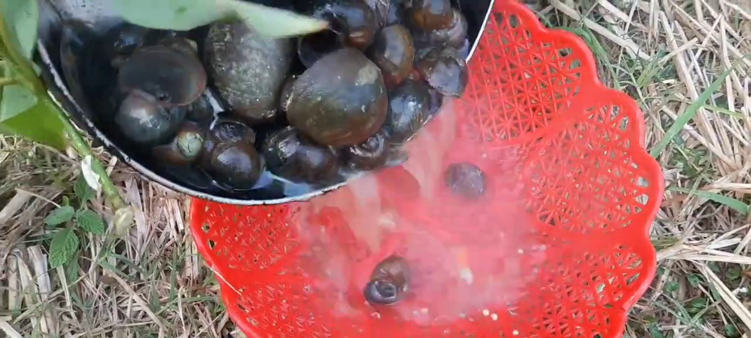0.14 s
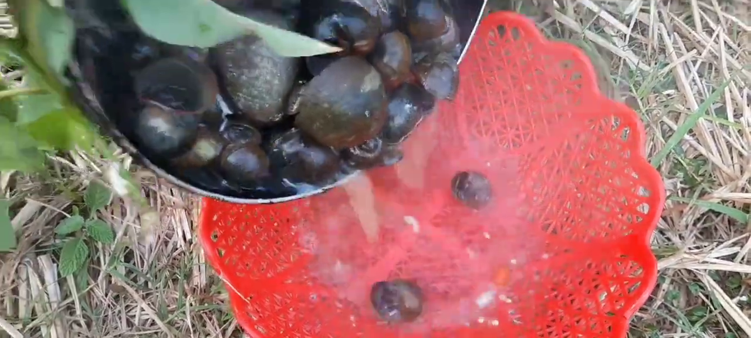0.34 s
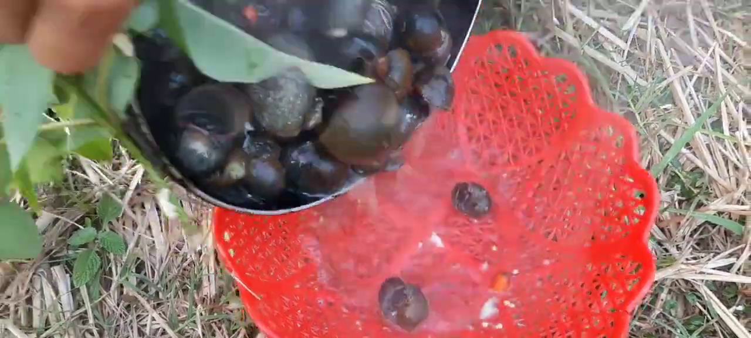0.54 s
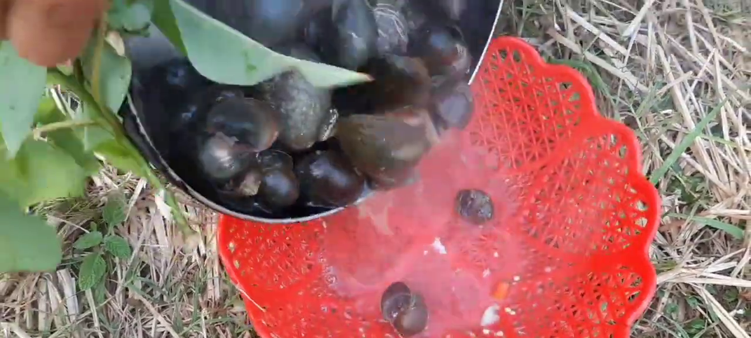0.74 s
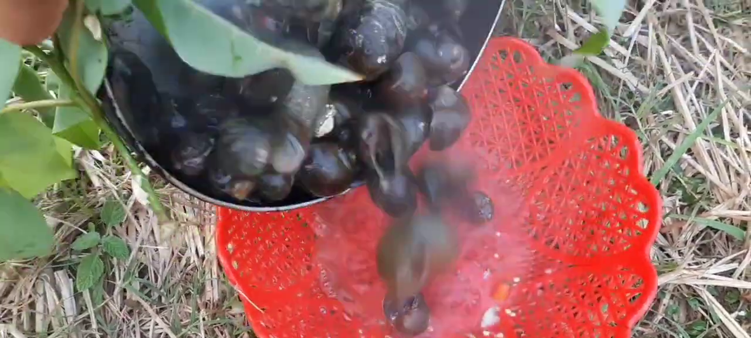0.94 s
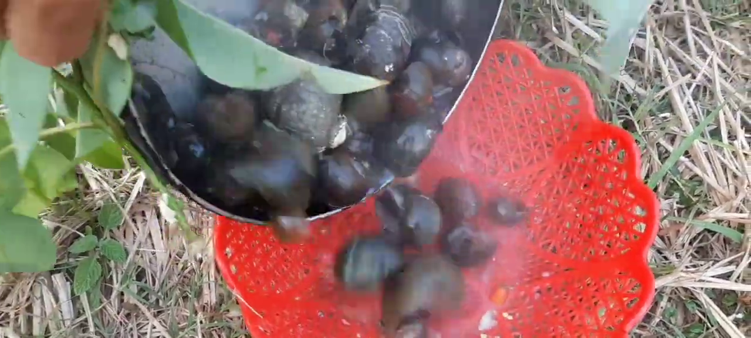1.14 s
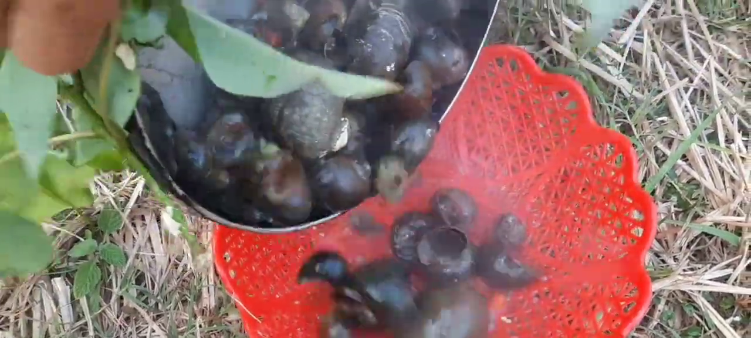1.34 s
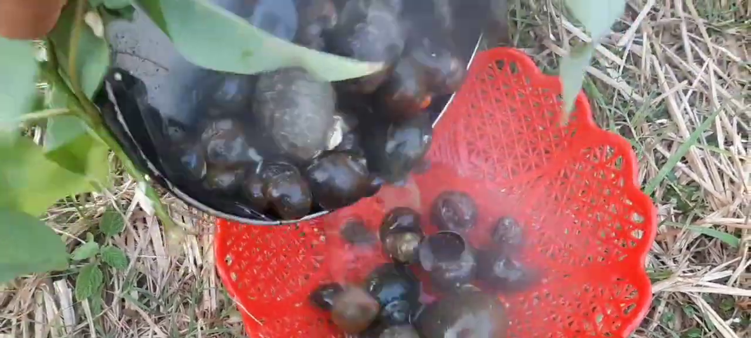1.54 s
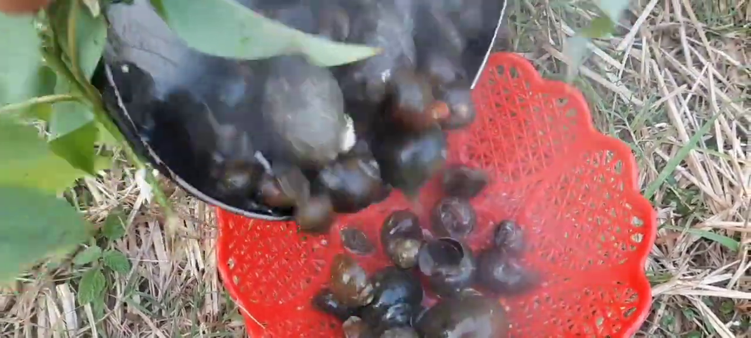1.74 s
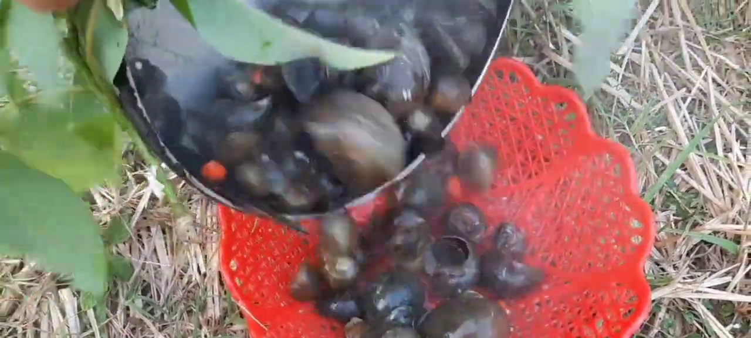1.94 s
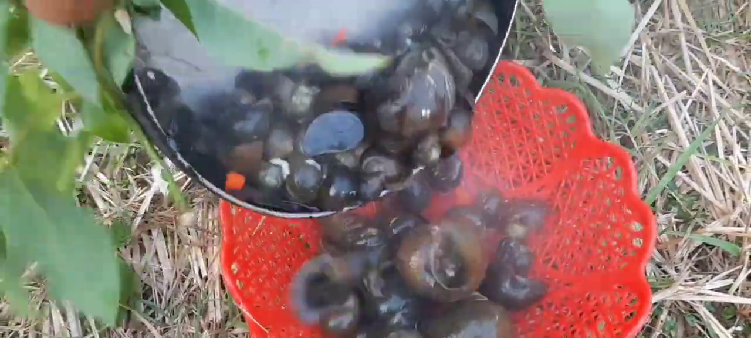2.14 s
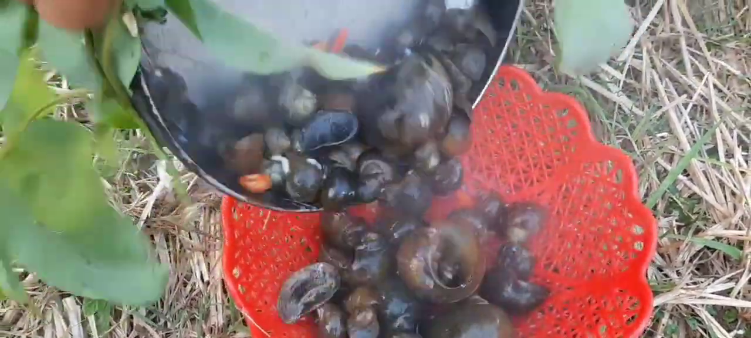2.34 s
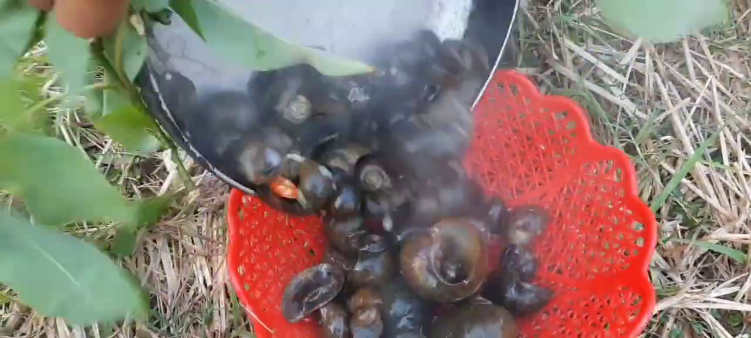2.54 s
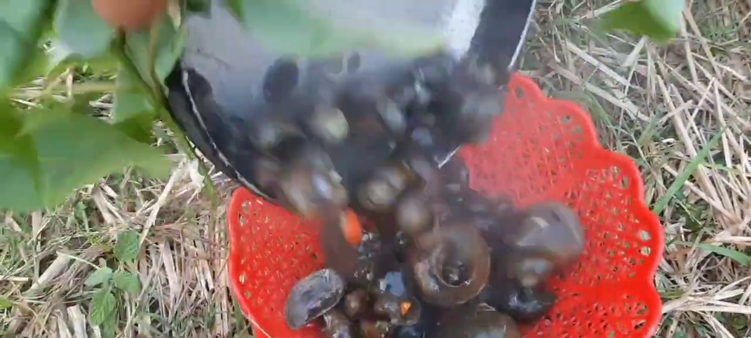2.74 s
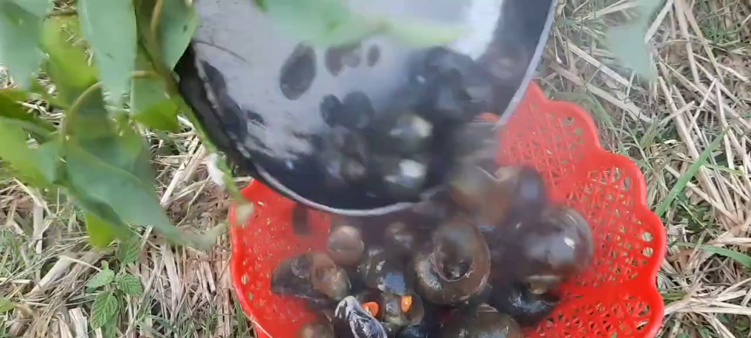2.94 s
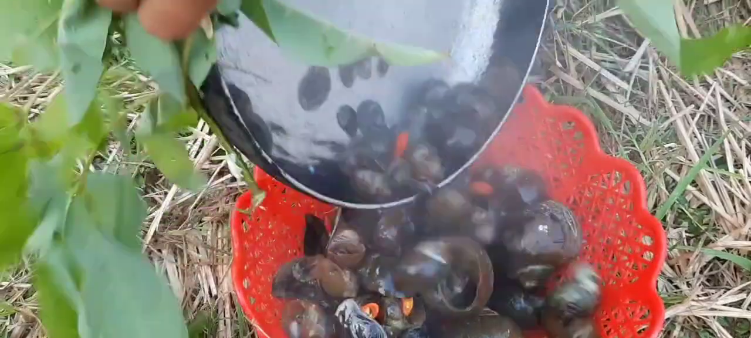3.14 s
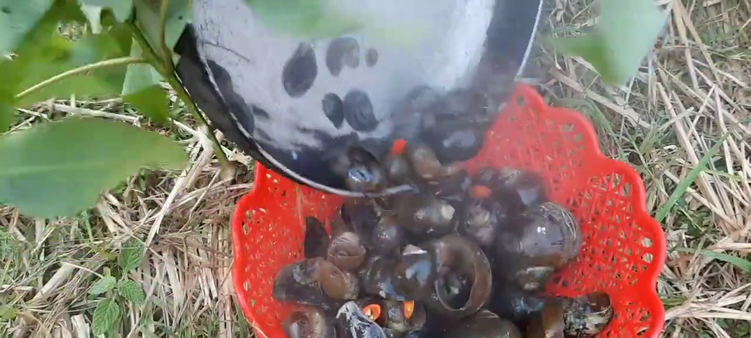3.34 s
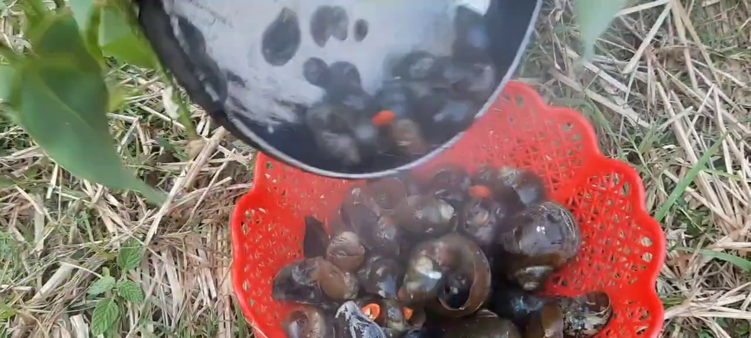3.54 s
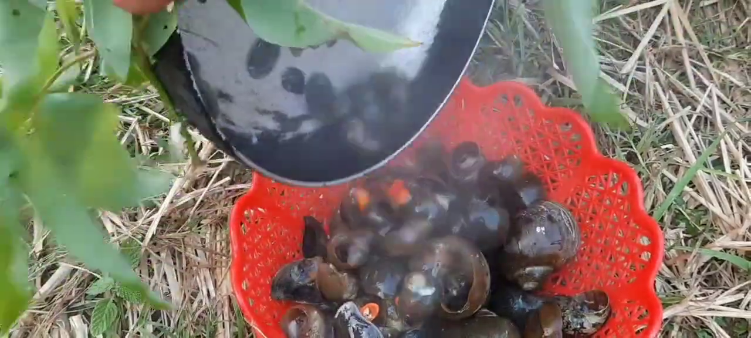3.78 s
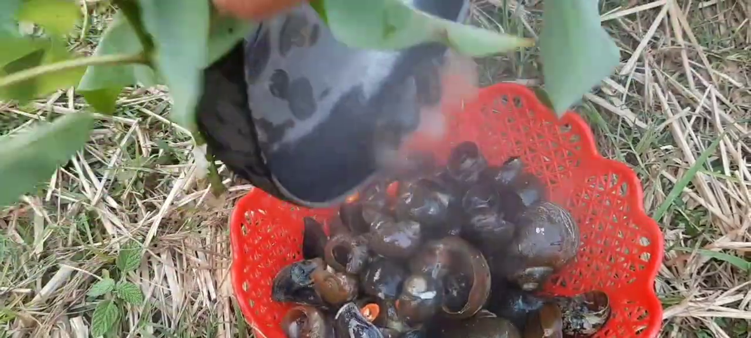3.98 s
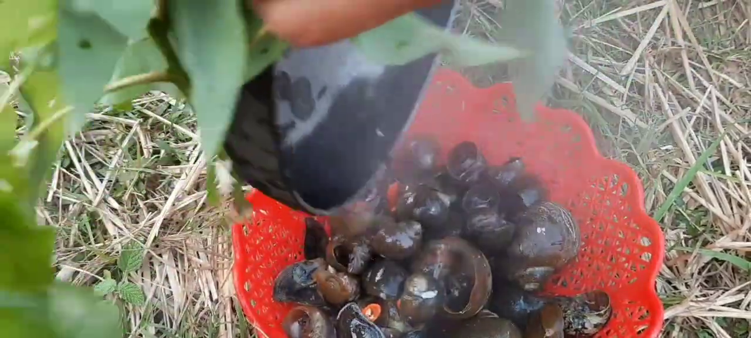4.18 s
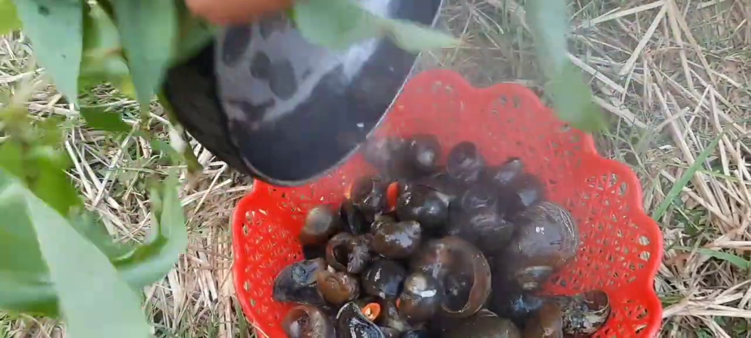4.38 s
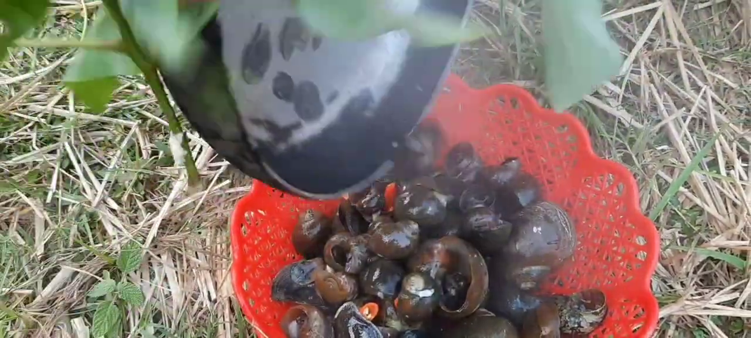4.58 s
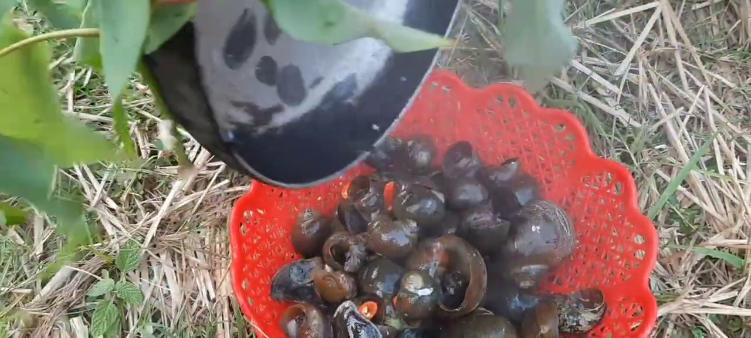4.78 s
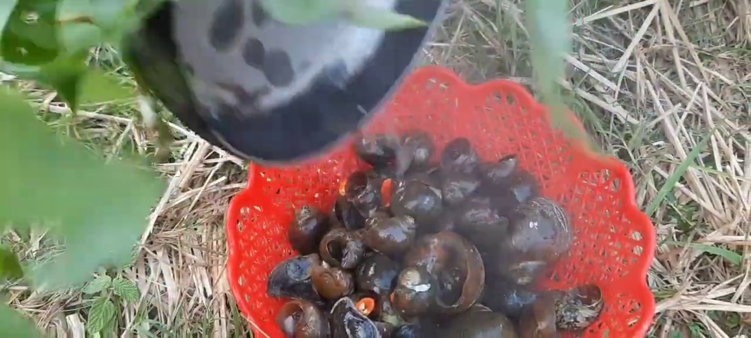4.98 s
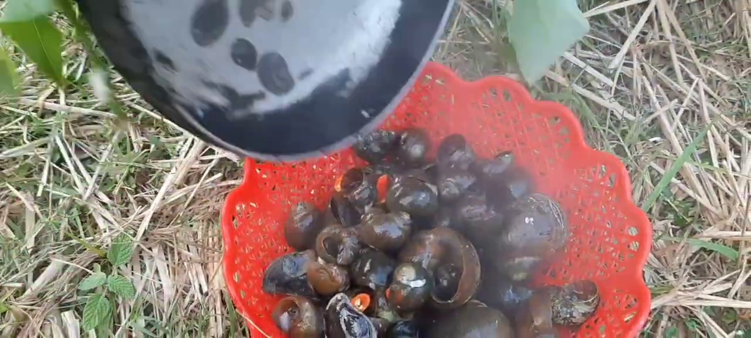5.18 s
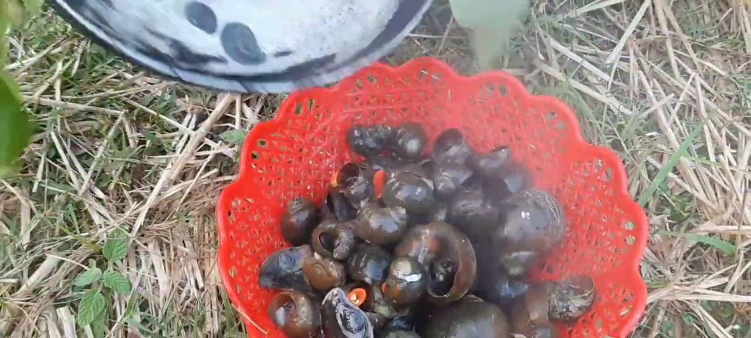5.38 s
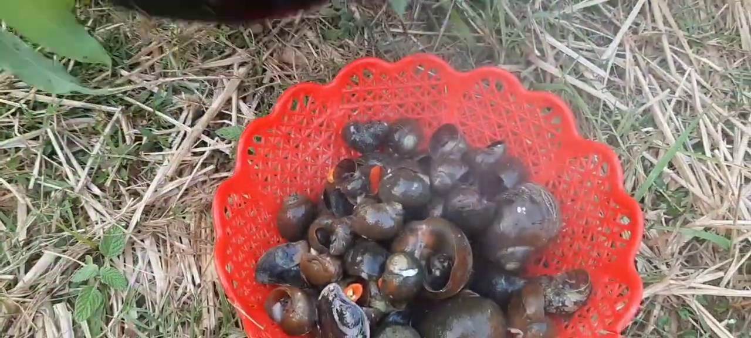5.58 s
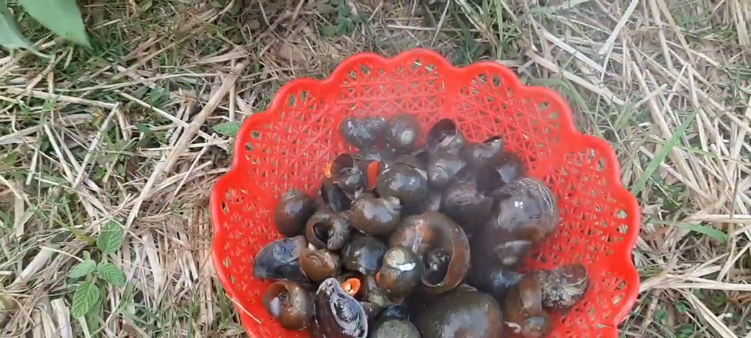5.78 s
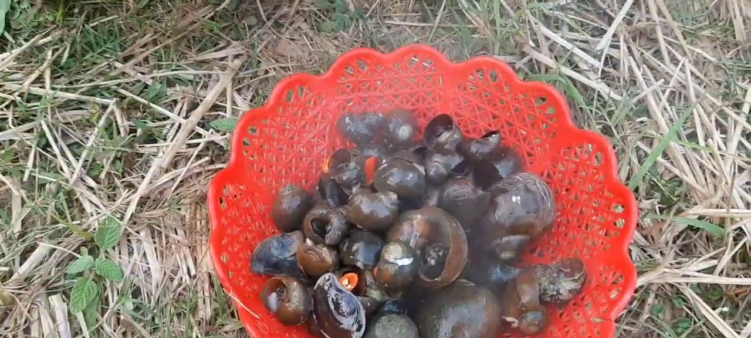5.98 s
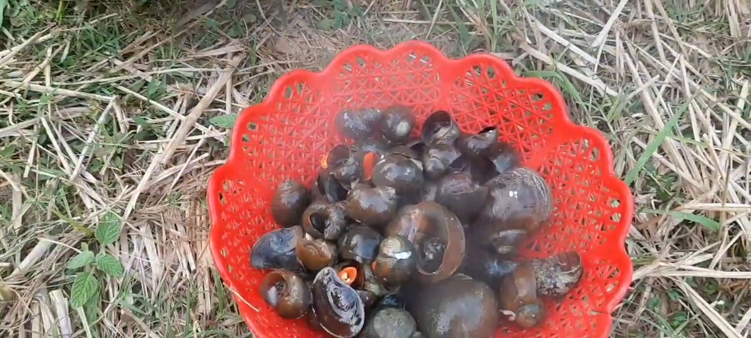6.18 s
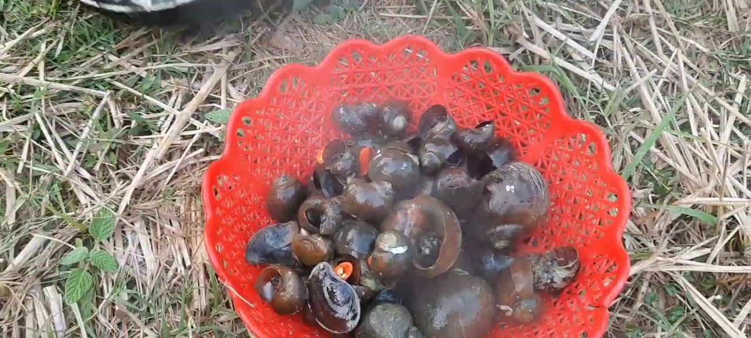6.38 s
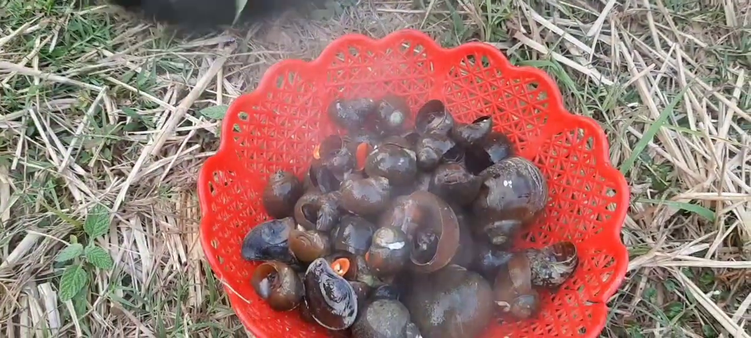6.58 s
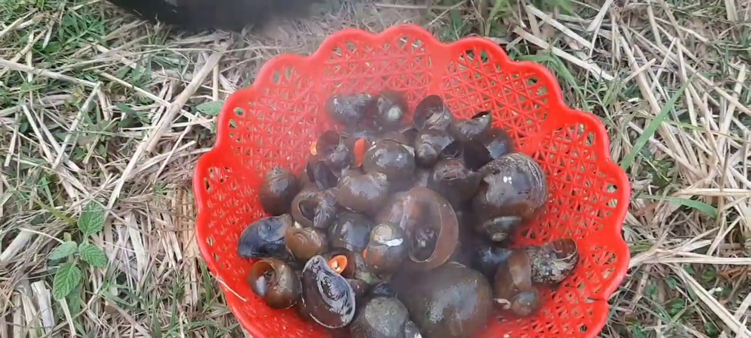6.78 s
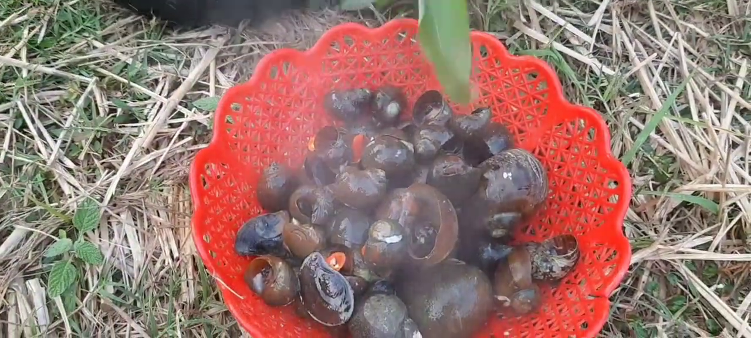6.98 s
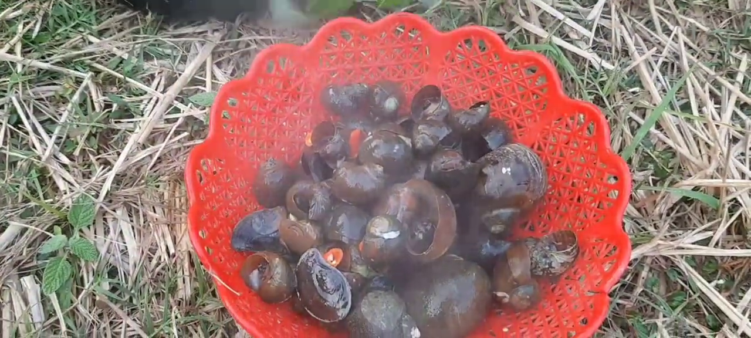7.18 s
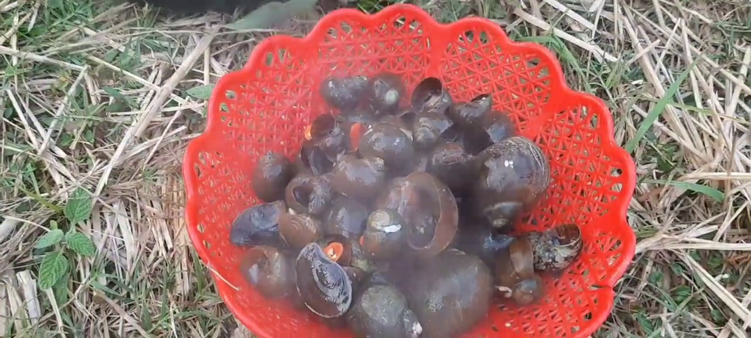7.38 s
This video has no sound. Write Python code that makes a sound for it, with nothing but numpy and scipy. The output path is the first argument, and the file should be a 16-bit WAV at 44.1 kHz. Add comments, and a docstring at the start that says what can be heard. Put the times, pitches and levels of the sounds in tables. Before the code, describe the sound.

Hard, hollow shell clacks tumble from a metal pan into a plastic basket, with sharp metallic clangs, then stray ticks and soft leaf rustle.

```python
"""On the grass, boiled snails slide out of a metal pan into a plastic colander, close to a two-port microphone.
Shell clacks are short dying sines plus a noise crack; the pan and the colander wall ring with their own modes.
Random knocks under the level of each shake make the rattle and the scraping; a dragged shell sings.
Behind: shaped noise for far rumble, insects and soft tones, a bird's gliding chirp with echoes,
and flickering noise for leaves brushed aside at the end."""
import sys
import numpy as np
from scipy import signal
from scipy.fft import rfft, irfft
from scipy.io import wavfile
from scipy.ndimage import uniform_filter1d

SR = 44100
rng = np.random.default_rng(int(sys.argv[2]) if len(sys.argv) > 2 else 0)


def persist_wave(psi):
    """Save psi, clipped to +-1, as 16-bit WAV."""
    counts = np.round(np.clip(psi, -1, 1) * 32767).astype(np.int16)
    wavfile.write(sys.argv[1], SR, np.atleast_2d(counts).T)


N = 327409  # length in samples

# Ringing of the pan, before the load shortens it: pitch_hz [Hz], level_db [dB], time to fall 60 dB t60_s [s]
PAN_MODES = [(1004, -3, .15), (1305, 0, .14), (1584, -4, .17), (1992, -12, .09), (2240, -4, .14),
             (2450, -8, .06), (2865, -4, .13), (3585, -9, .09), (4225, -13, .08), (5109, -7, .1)]
# Colour of a clack's first crack; leaves use half these dB: frequency_hz [Hz], relative level_db [dB]
CRACK_COLOUR = [(120, -39.5), (400, -12.5), (1000, -2.5), (2500, -1), (6300, 3.5), (9500, -15.5),
                (13000, -7), (15500, -12), (16400, -36)]


def amp(db):
    """Turns decibels into a plain gain."""
    return 10 ** (np.asarray(db) / 20)


def evened(x):
    """Scales a sound to an average (rms) strength of 1."""
    return x / np.sqrt(np.mean(x ** 2) + 1e-20)


def read(points, hz):
    """Reads a curve between its points on a log-frequency axis."""
    f, value = np.transpose(points)
    return np.interp(np.log(hz + 1), np.log(f + 1), value)


def add(mix, start_s, sound):
    """Adds a sound to the mix at its start, cut off at the end of the mix."""
    part = mix[:, round(start_s * SR):][:, :sound.shape[1]]
    part += sound[:, :part.shape[1]]


def ring(hz, db, t60, phase, length=2000):
    """A struck object rings as a sum of sines, each dying by 60 dB in its t60 seconds."""
    t = np.arange(length) / SR
    fading = amp(db[:, None] - 60 * t / t60[:, None])
    waves = np.sin(2 * np.pi * hz[:, None] * t + phase[:, None])
    return (fading * waves).sum(0)


def coloured(x, points):
    """Filters the last axis by a spectrum given in dB."""
    n = x.shape[-1]
    return irfft(rfft(x) * amp(read(points, np.fft.rfftfreq(n, 1 / SR))), n)


def knocks(per_s, spread_db):
    """Sparse random impulses, a few of them large; rms 1."""
    sizes = amp(spread_db * np.minimum(rng.exponential(1, N), 4))
    happens = rng.random(N) < per_s / SR
    return evened(sizes * happens)


def surges(rows, column, rise_db_per_s, fall_db_per_s):
    """Gain of overlapping surges: each rises up to its start, holds and falls; their powers add."""
    t = np.arange(0, N / SR + .01, .002)
    db = []
    for row in rows:
        start_s, hold_s = row[0], abs(row[1])
        early_s = np.maximum(start_s - t, 0)
        late_s = np.maximum(t - start_s - hold_s, 0)
        db.append(row[column] - rise_db_per_s * early_s - fall_db_per_s * late_s)
    gain = np.sqrt((amp(db) ** 2).sum(0))
    return np.interp(np.arange(N) / SR, t, gain)


def noise(gain, patchy_db):
    """Two-port noise with drifting patches, steadier in the bass; gain is a function of Hz."""
    # how alike the two ports are: frequency_hz [Hz], likeness [0-1]
    alike = [(60, 1), (300, 0.74), (700, 0.49), (1400, 0.02)]
    frames, hz = N // 256 + 5, np.fft.rfftfreq(1024, 1 / SR)
    a, b, c, d, patches = rng.standard_normal((frames, 513, 5)).T
    # smooth the patches over frequency, then over time
    patches = uniform_filter1d(patches, size=10, axis=0)
    patches = evened(uniform_filter1d(patches, size=12, axis=1))
    same = np.clip(read(alike, hz), 0, 1)[:, None]
    left = a + 1j * b
    right = same * left + np.sqrt(1 - same ** 2) * (c + 1j * d)
    patch_depth_db = patchy_db * np.minimum(hz / 1500, 1)[:, None]
    spectra = np.array([left, right]) * gain(hz)[:, None] * amp(patch_depth_db * patches)
    sound = signal.istft(spectra, nperseg=1024, noverlap=768)[1]
    return evened(sound[:, :N])


def clack(hz, bright_db, treble_db):
    """Shell on shell: the body rings, the thin lips ring, and a short noise crack starts it."""
    # ringing of a shell: multiple of its pitch, level_db [dB], time to fall 60 dB t60_s [s]
    shell = [(.55, -3.5, 0.016), (0.998, 8.5, 0.017), (1.5, 6.5, 0.0051)]
    # left port over right, by the pitch of a clack: pitch_hz [Hz], difference_db [dB]
    lean = [(1300, 1.5), (2600, -1.5), (5000, -5.5)]
    # thin lips of the shells, before each clack detunes them: pitch_hz [Hz]
    lip_hz = np.array([3700, 4600, 5300, 6150])
    t = np.arange(2000) / SR
    ratio, db, t60 = np.transpose(shell)
    body_hz, count = hz * ratio, len(lip_hz)
    detune = 1 + 0.047 * rng.standard_normal(count)
    strength_db = 5 * rng.standard_normal(count)
    colour = [(f, level + treble_db * (f > 10000)) for f, level in CRACK_COLOUR]
    bright = min(amp(bright_db), 1)
    left_over_right_db = read(lean, hz) + 2.5 * rng.standard_normal()
    ports = []
    for side in (1, -1):
        # the two ports hear short waves at unrelated phases, long waves alike
        body_phase = side * (body_hz / 2200) ** 2 * rng.random()
        body = 0.51 * ring(body_hz, db, t60, body_phase)
        lip = ring(lip_hz * detune, strength_db, np.full(count, .022), rng.uniform(0, 2 * np.pi, count))
        crack = evened(coloured(rng.standard_normal(len(t)), colour)) * amp(-60 * t / 0.016)
        whole = np.sqrt(1 - min(bright, .7) ** 2) * body  # brighter clacks have less body
        whole = whole + bright * 1.02 * lip / abs(lip).max()
        whole = whole + (0.3 + 1.605 * bright) * crack
        soft_start = 1 - np.exp(-t / 0.00027)
        ports.append(amp(side * left_over_right_db / 2) * whole * soft_start)
    return np.array(ports)


def clacks():
    """The loudest shell clacks, each with a quick, weaker bounce; harder ones have more treble."""
    # the clacks: start_s [s], level_db [dB], pitch_hz [Hz], bright share bright_db [dB, at most 0 counts]
    hits = [(0.397, -12.5, 2270, -6.5), (0.421, -26, 1310, -39), (0.555, -20, 1240, -20),
            (0.601, -30, 1220, -45), (0.727, -19, 1370, -24), (0.74, -18, 1320, -7),
            (0.759, -12.5, 2240, -45), (0.826, -24, 930, -36), (0.844, -4.5, 2100, -21),
            (0.887, -10.5, 2210, -44), (0.905, -21, 3450, -43), (0.928, -19.5, 1460, -18),
            (0.954, -12.5, 1300, -23), (0.969, -11.5, 1800, -4.5), (0.993, -20.5, 950, -22),
            (1.012, -13, 5370, 3), (1.021, -12.5, 2360, -4), (1.108, -18.5, 1760, 0.5),
            (1.117, -19.5, 5350, 0), (1.124, -12, 696, -28), (1.14, -16, 1260, -7),
            (1.191, -2.5, 2730, -42), (1.23, -11.5, 2240, -6), (1.248, -12.5, 727, -11),
            (1.308, -7, 2365, -14), (1.332, -16.5, 960, -3), (1.349, -6.5, 2596, -11),
            (1.388, -7, 2510, -60), (1.417, -7.5, 2400, -52), (1.436, -20.5, 1300, -32),
            (1.453, -14, 1070, -20), (1.479, -15.5, 4690, 0.5), (1.605, -12.5, 980, 2),
            (1.638, -8.5, 1330, -9), (1.707, -15.5, 5470, 0), (1.768, -21, 775, -14),
            (1.887, -19.5, 5140, 0), (1.899, -14.5, 2040, 0.5), (1.955, -17, 4590, -19),
            (1.973, -16, 1790, -8.5), (2.086, -12.5, 1580, 0), (2.137, -2, 1565, -18.5),
            (2.018, -27, 3140, 2), (2.214, -24.5, 3020, -10), (2.281, -16, 2810, -17),
            (2.353, -18, 2300, -4.5), (2.57, -12, 2280, 0), (2.604, -15, 4640, 1.5),
            (2.778, -19, 4400, 3.5), (2.914, -11, 4620, -18), (3.07, -21.5, 990, 0), (3.122, -17, 1860, 16),
            (3.151, -12, 1980, -10), (3.213, -20.5, 5520, 0), (3.438, -23.5, 4640, -29),
            (3.748, -11, 5490, -5.5), (3.761, -11.5, 1990, -9), (3.774, -9.5, 4880, -9.5),
            (3.791, -15.5, 5750, 2), (3.856, -26, 1930, -22), (4.112, -26, 4600, -1), (4.12, -25, 2430, -6),
            (4.129, -8.5, 2380, -16), (4.148, -29, 4440, -3), (4.161, -17, 2520, -7.5),
            (4.495, -23.5, 1450, 0), (4.68, -11, 5290, -12.5), (4.697, -32, 3640, -9),
            (4.722, -31, 5170, 1), (4.737, -30, 5130, -6.5), (4.79, -36, 1540, -3.5)]
    treble_per_db = .1  # dB of crack treble for each dB of blow
    out = np.zeros((2, N))
    for start_s, level_db, pitch_hz, bright_db in hits:
        sound = clack(pitch_hz, bright_db, -2.0 + treble_per_db * level_db)
        add(out, start_s, amp(level_db) * sound)
        bounce_s = start_s + 0.0013 + 0.0044 * rng.random()
        add(out, bounce_s, amp(level_db - 6.5) * sound)
    return out


def thuds():
    """Shells landing on the plastic ring the colander wall softly, alike at both ports."""
    # landings: start_s [s], level_db [dB]
    landings = [(1.029, -14.5), (1.057, -9.5), (1.363, -15.5), (1.949, -20), (1.975, -20)]
    # colander wall, before each landing varies it: pitch_hz [Hz], level_db [dB], time to fall 60 dB t60_s [s]
    wall = [(135, -13, .07), (300, -2, .04), (445, -1, .03), (660, -1, .022)]
    length = 6200  # samples
    hz, db, t60 = np.transpose(wall)
    soft_start = np.minimum(np.arange(length) / SR / 0.003, 1)
    out = np.zeros((2, N))
    for start_s, level_db in landings:
        detune = rng.uniform(0.81, 1.2, len(hz))
        colour_db = 3 * rng.standard_normal(len(hz))
        sound = ring(hz * detune, db + colour_db, t60, np.zeros(len(hz)), length=length)
        add(out, start_s, (amp(level_db) * sound * soft_start)[None])
    return out


def slide(column):
    """How hard the heap slides at each shake, for the pan or for the rattle."""
    # shakes of the pan: start_s [s], hold_s [s], pan_db (pan ringing) [dB], rattle_db (small rattle) [dB];
    # both levels are scaled again where they are used
    shakes = [(.31, 0.1, -46.5, -52), (.46, 0.041, -45, -56.5), (.73, 0.12, -33.5, -49),
              (.83, 0.083, -33.5, -50), (1.035, 0.025, -28, -33), (1.12, 0.18, -40.5, -48),
              (1.34, 0.034, -35, -38), (1.44, 0.083, -49, -39.5), (1.6, 0.019, -25, -39.5),
              (1.85, 0.049, -29.5, -28), (2.08, 0.045, -38, -30), (2.52, 0.077, -32.5, -40),
              (2.66, 0.066, -65, -35), (2.79, 0.12, -32, -41), (2.865, 0.079, -28, -30),
              (3.11, 0.078, -34, -38), (3.375, 0.011, -39.5, -46.5), (3.44, 0.062, -38, -52.5),
              (3.69, .18, -32.5, -40), (4.19, 0.46, -53, -62), (6.6, 0.047, -58, -71.5)]
    return surges(shakes, column, rise_db_per_s=329.5, fall_db_per_s=253)


def rattle():
    """Many small clacks at random moments, from shells of 14 pitches."""
    out, level = np.zeros((2, N)), slide(column=-1)
    for hz in np.geomspace(700, 5200, num=14):
        sound = clack(hz, rng.uniform(-39.5, 0), 0)
        sound = sound / np.linalg.norm(sound[0])
        drive = level * knocks(36, 4.5)
        out += signal.oaconvolve(drive[None], sound, axes=1)[:, :N]
    return 0.67 * out


def pan_ring(spot_db, empty, length=6500):
    """Modes of the pan at both ports; the load damps them until the pan empties (0-1)."""
    loaded_ring, empty_ring = 0.24, 0.84  # factors on the ringing times
    hz, db, t60 = np.transpose(PAN_MODES)
    rise = 1 - np.exp(-np.arange(length) / SR / 0.00013)
    ringing_s = (loaded_ring + (empty_ring - loaded_ring) * empty) * t60
    ports = []
    for side in (1, -1):
        phase = side * (hz / 2400) ** 2
        ports.append(rise * ring(hz, db + spot_db, ringing_s, phase, length=length))
    return np.array(ports)


def skid(sound):
    """A shell skids for a few milliseconds as it lands: a ragged start."""
    slips = rng.standard_normal(round(.003 * SR)) ** 3
    return signal.oaconvolve(sound, slips[None] / np.linalg.norm(slips), axes=1)


def pan():
    """Shells scraping along the metal at several spots, and single hard blows that favour one mode."""
    # hard blows: start_s [s], level_db [dB], favoured_hz (mode nearest the struck spot) [Hz]
    blows = [(.888, -6.5, 1305), (1.8461, -8, 1280), (1.854, 3.5, 1220), (1.863, -4.5, 1350),
             (1.872, -15.5, 1110), (2.095, -19.5, 1580), (2.3, -20, 1305), (2.354, -24, 1305),
             (2.408, -12.5, 1460), (2.572, -12, 1305), (2.6466, -2, 1200), (2.87, -16.5, 1004),
             (3.196, -28.5, 1004), (3.443, -34, 1260), (3.603, -35.5, 1140), (4.1755, -19.5, 1584),
             (4.35, -45.5, 1305), (4.497, -24.5, 2420), (4.572, -32, 1550), (4.6035, -23, 1450)]
    empty_from_s, empty_takes_s = 1.9, .8
    empty = np.clip((np.arange(N) / SR - empty_from_s) / empty_takes_s, 0, 1)
    level, out = slide(column=-2), np.zeros((2, N))
    # three spots on the full pan fade into three on the empty pan
    for state in (0, 0, 0, 1, 1, 1):
        modes = pan_ring(5 * rng.standard_normal(len(PAN_MODES)), state)
        scrape = knocks(90, 6)
        drive = .5 * level * np.sqrt(abs(1 - state - empty)) * scrape
        out += signal.oaconvolve(drive[None], modes / np.linalg.norm(modes[0]), axes=1)[:, :N]
    for start_s, level_db, favoured_hz in blows:
        octaves_away = abs(np.log2(np.transpose(PAN_MODES)[0] / favoured_hz))
        spot_db = -50 * np.minimum(octaves_away, .23)
        sound = skid(pan_ring(spot_db, empty[round(start_s * SR)]))
        add(out, start_s, amp(level_db) * sound)
    return out


def drag():
    """A shell drags along the full pan: quick uneven slips keep two modes singing."""
    # the drag: start_s [s], length_s [s], level_db [dB], first_hz [Hz], second_hz [Hz]
    shell_drag = (.285, .12, -38, 2255, 4800)
    start_s, length_s, level_db, *hz = shell_drag
    slips = knocks(810, 6.6)[:round(length_s * SR)]
    modes = ring(np.array(hz), np.zeros(2), np.array([.04, .02]), np.zeros(2))
    sound = evened(signal.oaconvolve(slips, modes))
    out = np.zeros((2, N))
    # half as strong and upside down at the right port
    add(out, start_s, amp(level_db) * sound * np.array([[1], [-.5]]))
    return out


def leaves():
    """Leaves brushed aside: fine crackling noise, flickering across the whole band."""
    # brushes: start_s [s], hold_s [s], level_db [dB]
    brushes = [(6.56, 0.082, -55.5), (6.75, 0.072, -48.5), (7, 0.22, -62)]
    flicker = evened(uniform_filter1d(rng.standard_normal(N), size=500))
    level = surges(brushes, -1, rise_db_per_s=115, fall_db_per_s=123.5)
    crackle = noise(lambda f: amp(.5 * read(CRACK_COLOUR, f)), 2.0)
    return level * amp(1.5 * flicker) * crackle


def bird():
    """A faint whistle glides down, loudest in the middle, smeared by echoes from the trees."""
    # chirps: start_s [s], level_db [dB]
    calls = [(0.115, -58), (0.56, -57), (4.0, -60), (5.39, -54), (6.67, -50)]
    from_hz, to_hz, chirp_s = 5600, 2150, .15
    u = np.arange(0, 1, 1 / SR / chirp_s)  # progress through one chirp
    hz = from_hz * (to_hz / from_hz) ** u
    tone = np.sin(np.pi * u) * np.sin(2 * np.pi * np.cumsum(hz) / SR)
    plain = np.zeros((1, N))
    for start_s, level_db in calls:
        add(plain, start_s, amp(level_db) * tone[None])
    # echoes are noise dying by 60 dB in 0.2 s
    echoes = rng.standard_normal((2, SR // 4)) * amp(-60 * np.arange(SR // 4) / SR / .2)
    return signal.oaconvolve(plain, echoes / np.linalg.norm(echoes[0]), axes=1)[:, :N]


def tones():
    """Soft far tones, made fuzzy by slow random changes of strength and phase, fade in and out: a thin line of
    insect song high up and a lower whistle."""
    # far tones: start_s [s], length_s [s], pitch_hz [Hz], level_db [dB]; the 7300 Hz one is insect song
    far_tones = [(4.8, 1.1, 7300, -75), (5.95, 1.4, 2350, -69)]
    out = np.zeros((2, N))
    for start_s, length_s, pitch_hz, level_db in far_tones:
        turn = 2 * np.pi * pitch_hz * np.arange(0, length_s, 1 / SR)
        a, b = uniform_filter1d(rng.standard_normal((2, 2, len(turn))), size=200)
        fuzzy = a * np.cos(turn) + b * np.sin(turn)
        add(out, start_s, amp(level_db) * evened(signal.windows.tukey(len(turn)) * fuzzy))
    return out


def air():
    """Shaped noise: far rumble that slowly moves away, hiss, and a band of insect song."""
    # colour of the open air: frequency_hz [Hz], relative level_db [dB]
    air_colour = [(24, -56.5), (50, 4), (75, -1.5), (172, -17.5), (250, -35.5), (305, -20), (390, -35.5),
                  (688, -42), (1320, -42), (2450, -38.5), (9500, -47.5), (15200, -51), (16400, -83.5)]
    # insect bands: centre_hz [Hz], width_hz [Hz], relative level_db [dB]
    insects = [(11000, 900, -5)]

    def insect_gain(f):
        return sum(amp(db) / (1 + (2 * (f - hz) / width) ** 2) for hz, width, db in insects)

    wash = noise(lambda f: amp(read(air_colour, f)), 2.6)
    rumble = signal.sosfilt(signal.butter(N=2, Wn=400, fs=SR, output="sos"), wash)
    fading = amp(-0.62 * np.arange(N) / SR)  # the rumble loses 0.62 dB per second
    return amp(-45) * (wash + (fading - 1) * rumble) + amp(-68.5) * noise(insect_gain, 1.2)


def scene():
    """All sources together, at both ports."""
    shells = clacks() + thuds() + rattle() + pan() + drag()
    return shells + leaves() + bird() + tones() + air()


def record(dry):
    """Left port a little louder, soft overload on the hardest clacks, bass roll-off, then the band limit."""
    loud = np.tanh(dry * amp([[.6], [-.6]]))
    thin = signal.sosfilt(signal.butter(N=4, Wn=52, btype="high", fs=SR, output="sos"), loud)
    band_limit = signal.firwin(511, 16300, window=("kaiser", 9), fs=SR)  # treble edge in Hz
    return signal.oaconvolve(thin, band_limit[None], "same")


dry = scene()
out = record(dry)
persist_wave(out)
```